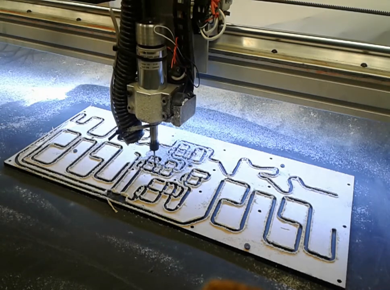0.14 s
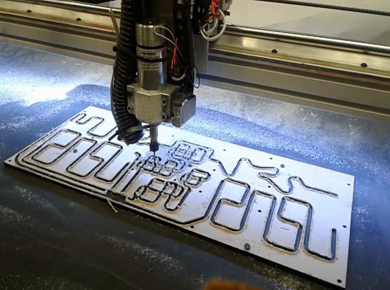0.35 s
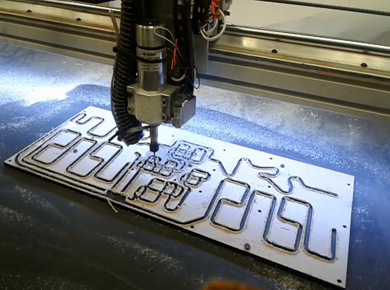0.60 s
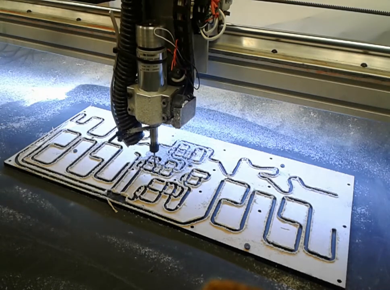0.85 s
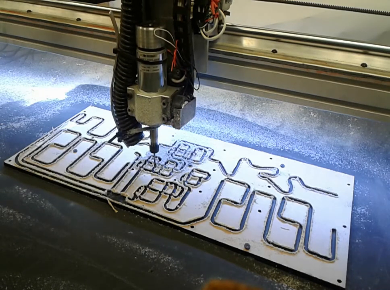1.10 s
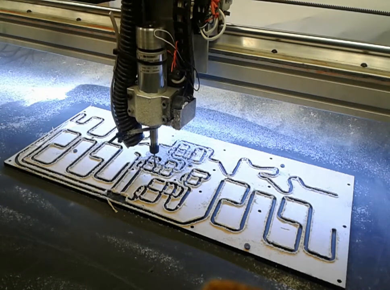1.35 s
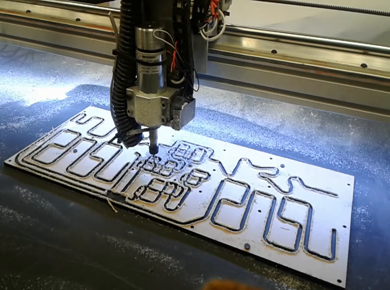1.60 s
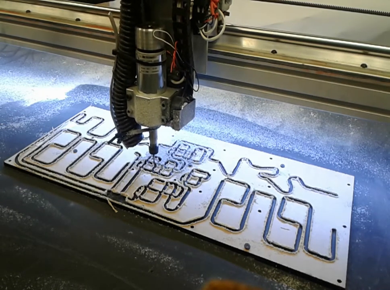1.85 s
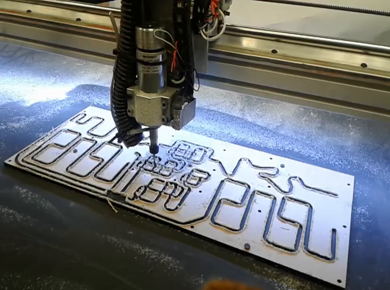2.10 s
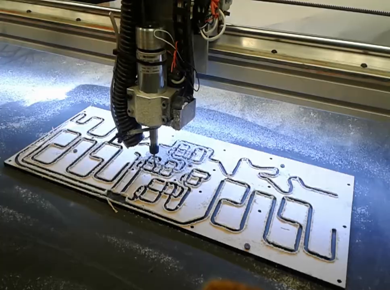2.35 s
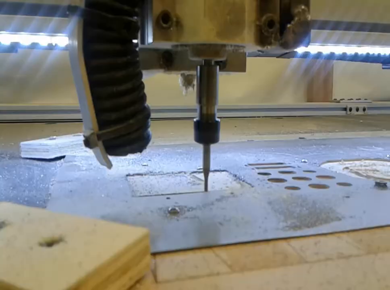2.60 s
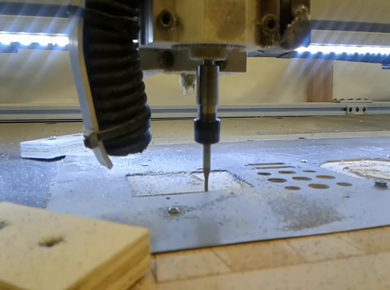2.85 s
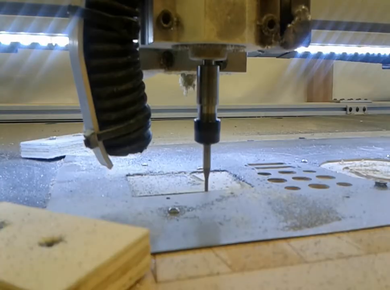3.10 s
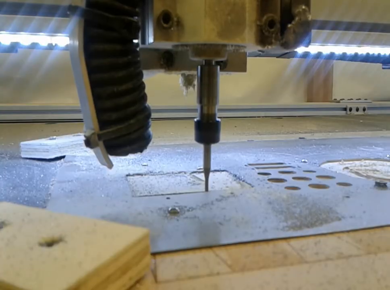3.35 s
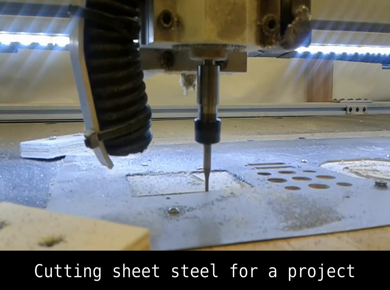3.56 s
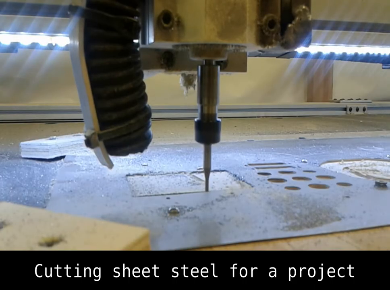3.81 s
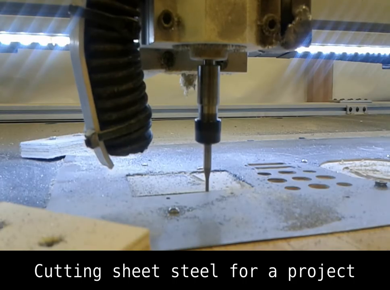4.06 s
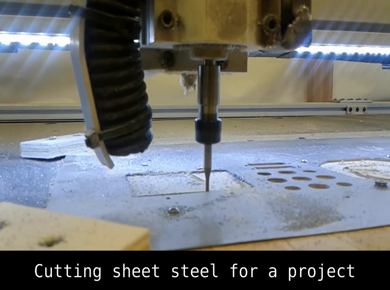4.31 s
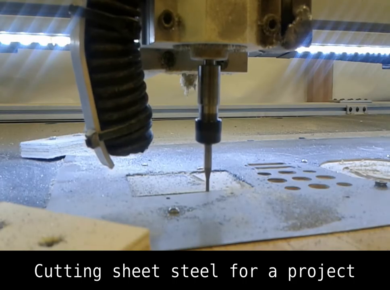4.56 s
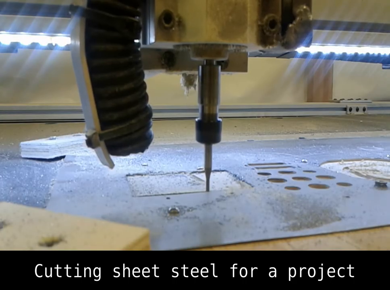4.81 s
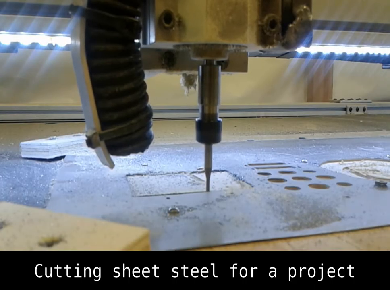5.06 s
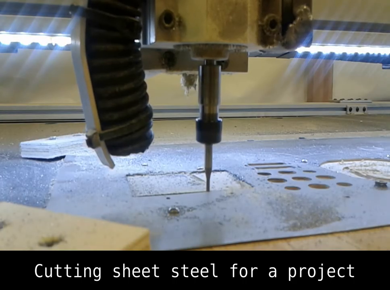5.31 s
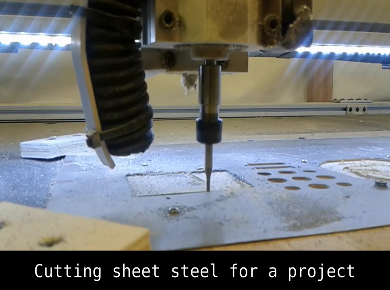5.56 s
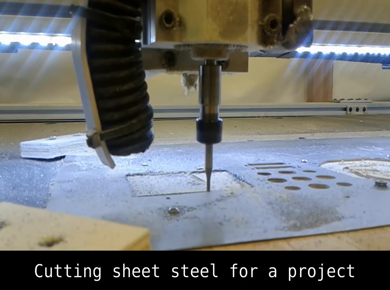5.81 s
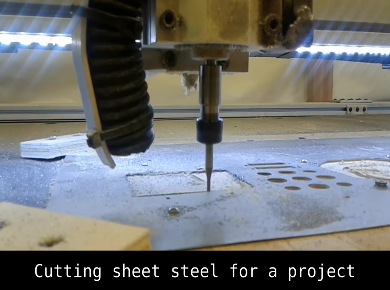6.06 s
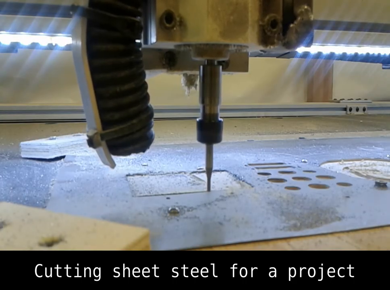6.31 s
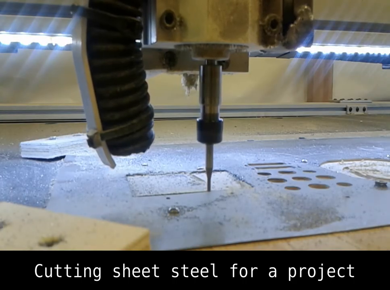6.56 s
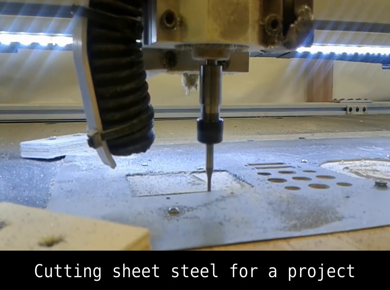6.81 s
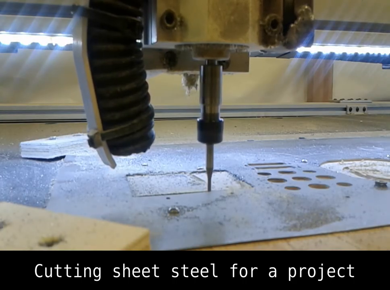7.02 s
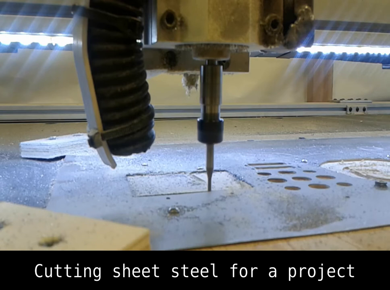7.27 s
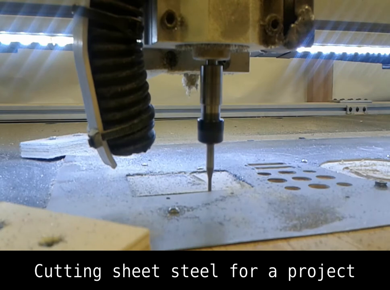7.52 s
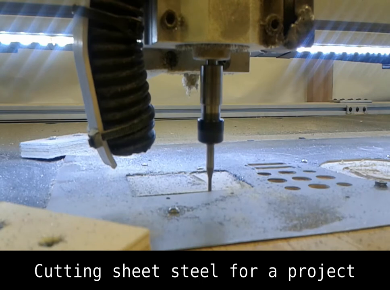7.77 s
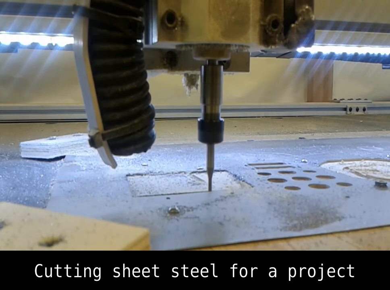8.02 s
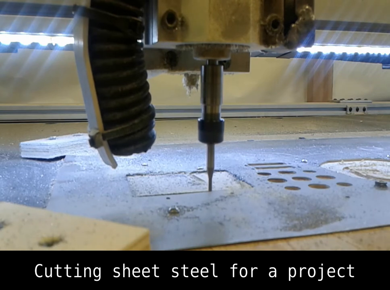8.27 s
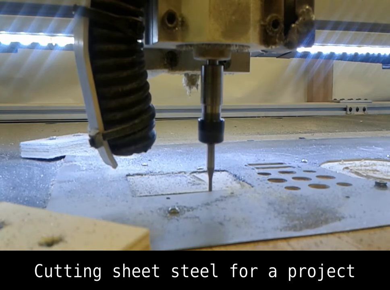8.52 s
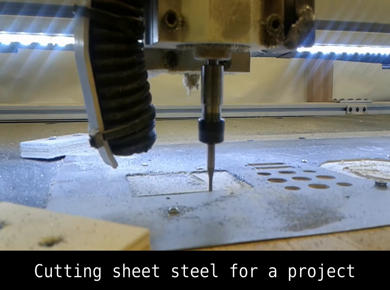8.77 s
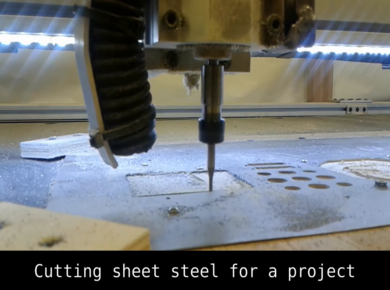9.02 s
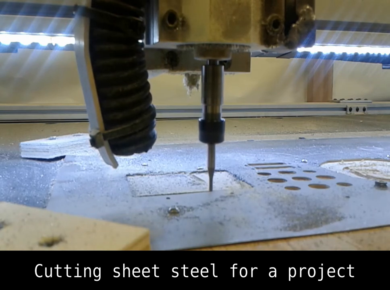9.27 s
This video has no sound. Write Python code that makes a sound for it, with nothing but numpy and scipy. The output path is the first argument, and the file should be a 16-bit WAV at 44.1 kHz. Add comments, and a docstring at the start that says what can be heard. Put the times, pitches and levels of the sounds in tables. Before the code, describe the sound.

In a workshop, a milling spindle hums a step from the microphone beneath rushing air and extractor fan tones, its bit biting metal in short hissing passes while a thin whistle chirps. Sound stops abruptly at 2.4 seconds, then fades in close and louder: a steady buzzing whine of even harmonics, slightly uneven under load, with bright chip snaps and one brief low groan.

```python
"""Workshop, mono: a milling spindle cuts sheet metal beside a running dust extractor.
First, a step away, the bit bites in passes under air noise and fan tones while a thin whistle chirps.
The sound cuts to silence, then fades in close to the bit, where the cutting tones stand far above the air.
There uneven load bends pitch and level, chips snap brightly and one short low groan falls in pitch.
Each shaft turn strikes the sheet and spits chips: harmonics of the shaft speed plus pulsed hiss."""
import sys
import numpy as np
from scipy import signal
from scipy.io import wavfile
from scipy.ndimage import uniform_filter1d

SR = 44100
rng = np.random.default_rng(int(sys.argv[2]) if len(sys.argv) > 2 else 0)


def nominal_scale(level):
    """Amplitude ratio for a level in decibels (scalar or array-like)."""
    x = np.asarray(level, float) / 20
    return 10 ** x


def persist_wave(psi):
    """Save psi, clipped to +-1, as 16-bit WAV."""
    counts = np.round(np.clip(psi, -1, 1) * 32767).astype(np.int16)
    wavfile.write(sys.argv[1], SR, np.atleast_2d(counts).T)


N = 413658
TIME = np.arange(N) / SR

# low harmonics of the shaft, before each view's overall level: order (times shaft speed), level_db
FAR_LOW_ORDERS = [(1, 6), (2, -11), (3, 3.5), (4, -10.5), (5, -8.5), (6, -9.5), (7, -13.5), (8, -17.5),
                  (9, -14), (10, -11.5), (11, -15), (12, -8.5), (13, -4.5), (14, -10.5), (15, -6.5),
                  (16, -23), (17, -27), (18, -15), (19, -23), (20, -10.5), (21, -8), (22, -10), (23, -20),
                  (24, -25.5), (25, -12.5), (26, -17.5), (27, -17.5), (28, -18.5), (29, -14.5), (30, -11)]
NEAR_LOW_ORDERS = [(1, -9), (2, -15.5), (3, -2.5), (4, 0.5), (5, -9.5), (6, -1), (7, -9.5), (8, -3.5),
                   (9, -10.5), (10, -15.5), (11, -18.5), (12, -15), (13, -13.5), (14, -14), (15, -13),
                   (16, -26.5), (17, -27), (18, -26), (19, -23.5), (20, -25.5), (21, -32), (22, -23),
                   (23, -21.5), (24, -25.5), (25, -23.5), (26, -22), (27, -29), (28, -34), (29, -27),
                   (30, -24.5)]
# colour of the high orders, where bit and sheet ring: pitch_hz, relative level_db
FAR_RING_COLOUR = [(3410, -37), (5800, -10.5), (6770, -12), (7710, -0.5), (8070, -3), (8560, -8.5),
                   (8890, 6), (9150, -5.5), (9950, 3.5), (10800, -8), (11800, -22.5), (13500, -12),
                   (14300, -16.5), (14700, -11), (15800, -6.5)]
NEAR_RING_COLOUR = [(5900, -8.5), (6330, -7), (7100, -12), (7670, -7), (8050, -8), (8800, 0.5),
                    (9780, -0.5), (10170, -8), (10550, -12.5), (10740, -11), (10930, -10.5), (11500, -19.5),
                    (12080, -22), (12470, -14), (13400, -12), (14200, -15.5), (15800, -14.5)]
# colour of the rushing air and motor noise: pitch_hz, relative level_db (per Hz)
FAR_AIR_COLOUR = [(30, -30.5), (54, -5.5), (75, -9.5), (90, -15.5), (140, -2.5), (250, -6), (300, -1.5),
                  (480, -4.5), (660, -0.5), (820, -6.5), (1300, -10), (1700, -5.5), (2600, -8), (3300, -13),
                  (6000, -17), (7000, -21), (11300, -29), (15800, -30)]
NEAR_AIR_COLOUR = [(30, -37), (54, -13), (90, -20), (140, -3.5), (250, -8.5), (300, -6), (500, -5),
                   (700, -4.5), (850, -2), (1400, -3), (1700, 3), (2100, -4.5), (2450, -6), (3200, -8.5),
                   (4900, -8.5), (5300, -16.5), (9000, -42)]
# colour of the hiss of chips leaving the flute: pitch_hz, relative level_db (per Hz)
FAR_CHIP_COLOUR = [(3000, -21.5), (4200, -5.5), (6500, -15.5), (8200, -9), (8800, -4.5), (9400, -2),
                   (9800, -1), (10300, -2.5), (10800, -15), (11500, -25.5), (15800, -23)]
NEAR_CHIP_COLOUR = [(3000, -26.5), (5200, -12.5), (6500, -11.5), (7100, -8.5), (7400, -6.5), (8200, -3),
                    (8800, 2), (9800, -2), (10100, -4), (10600, -13.5), (11300, -16.5), (12150, -22),
                    (12350, -12.5), (13000, -14.5), (15800, -22.5)]
# a step away, the bit bites in short passes: start_s, length_s, bite level_db before flutter
BITE_PASSES = [(-.2, .27, -48), (.5, 0.34, -48), (1.27, 0.36, -49.5), (2.22, .05, -45.5),
               (2.3, 0.16, -46.5)]
# chirps of the thin whistle, above its floor: peak_s, level_db
WHISTLE_CHIRPS = [(.045, -56), (.215, -52), (.66, -57), (.77, -57), (.84, -58.5), (.93, -58.5), (1.13, -60),
                  (1.34, -54.5), (1.5, -58), (1.57, -57), (1.72, -58), (1.8, -60), (2.4, -57)]
# fuzzy tones of extractor fan and hose, as heard a step away: pitch_hz, width_hz, level_db
EXTRACTOR_TONES = [(60, 3, -64), (72, 6, -67), (284, 10, -55), (335, 30, -56), (437, 6, -57), (643, 5, -52),
                   (653, 5, -48.5), (869, 4, -60), (873.5, 4, -55), (1306, 8, -59), (1748, 6, -54.5),
                   (1959, 5, -57), (2137, 8, -63), (2189, 8, -63)]
# close up, the feed loads the bit unevenly: time_s, load_db before chatter
FEED_LOAD = [(3.05, 0.65), (3.14, -1.36), (3.22, 3.5), (3.74, -1.88), (3.82, 2), (4.81, -3), (4.85, -0.68),
             (5.04, -0.15), (5.14, -5.6), (5.35, 1.1), (5.67, -4.2), (5.79, 0.24), (6.1, -1.6),
             (6.17, -4.5), (6.28, 1.5), (6.36, -4), (6.41, 0.58), (6.91, 0.74), (6.97, 3.5), (7.26, -3.2),
             (8.49, 3.7), (8.55, -0.6), (8.69, 3.5), (9.36, -1)]
# the bit sinks deeper into the sheet: time_s, depth_db
BIT_DEPTH = [(3.05, -0.5), (3.76, -2), (3.79, -1.2), (6.81, -0.2), (7.15, -2), (7.34, 1.3), (7.78, 2.5),
             (9.36, 1.7)]
# how the low orders answer close up: order, db per db of load, db per db of depth
ORDER_ANSWERS = [(1, 0.23, 0.6), (2, 0.36, 0.5), (3, 0.07, 0.84), (4, 1.05, -0.03), (5, 0.2, -1.3),
                 (6, .05, 1.34), (7, -.3, -0.9), (8, 0.42, -.5), (9, -1, 0.45), (12, -1.5, 1.1),
                 (13, -0.3, 0)]
# sheet resonances stirred by the cut, before the bite's swing: pitch_hz, width_hz, level_db
SHEET_MODES = [(2280, 69, -50.5), (3585, 133, -48.5), (4360, 160, -56.5), (7270, 150, -55), (7800, 79, -50)]
# chips that snap against the bit: start_s, level_db, upper modes' relative level_db
CHIP_SNAPS = [(5.442, -30, -4), (5.9384, -24, -12), (6.1898, -31, -4), (7.003, -28, -8), (8.3883, -27, -4),
              (8.4168, -32, -6), (8.4811, -22, 2), (8.6991, -26, -1), (8.757, -26, -13.5)]
# ringing of the struck bit, before each snap's detuning: pitch_hz, relative level_db, 60 dB decay_s
BIT_MODES = [(7870, 0, .04), (9880, -2, .03), (11250, -12, .03), (14700, -12, .025)]

CUT_S, FADE_START_S, FADE_END_S = 2.4225, 2.756, 3.02
FLUTTER_HZ, FLUTTER_DB = 14, 1.5  # unsteadiness of the bite in both views: width, rms
NEAR_BITE_DB = -40
# the sheet answers a blow with a lead; past each bending resonance it swings the other way
LEAD_RAD, BENDING_HZ = 1, (1050, 1430, 1820)


def evened(x):
    """Scales to rms 1."""
    return x / np.sqrt(np.mean(abs(x) ** 2) + 1e-20)


def read(points, hz):
    """Reads a spectrum in dB on a log-frequency axis."""
    point_hz, level_db = np.transpose(points)
    return np.interp(np.log(hz + 1), np.log(point_hz + 1), level_db)


def add(mix, start_s, sound):
    """Mixes a sound in at its start time."""
    part = mix[round(start_s * SR):][:len(sound)]
    part += sound[:len(part)]


def wander(t, width_hz):
    """Slow complex chance of total rms 1: white noise through two equal poles, 400 draws a second."""
    step_s = np.arange(t[0], t[-1] + 1, 1 / 400)
    pole = np.exp(-np.pi * width_hz / 400)
    white = rng.standard_normal((len(step_s), 2)) @ [1, 1j]
    slow = evened(signal.lfilter([1], [1, -2 * pole, pole * pole], white))
    return np.interp(t, step_s, slow.real) + 1j * np.interp(t, step_s, slow.imag)


def flutter(t):
    """Quick unsteadiness of the bite, as a random swing in dB."""
    return FLUTTER_DB * np.sqrt(2) * wander(t, FLUTTER_HZ).real


def noise(t, colour, patchy_db):
    """Coloured noise of rms 1 from random short-time spectra with drifting patches (rms patchy_db)."""
    real, imaginary, patches = rng.standard_normal((len(t) // 256 + 5, 513, 3)).T
    patches = uniform_filter1d(patches, size=10, axis=0)  # across frequency
    patches = evened(uniform_filter1d(patches, size=12, axis=1))  # across time
    colour_db = read(colour, np.fft.rfftfreq(1024, 1 / SR))[:, None] + patchy_db * patches
    spectra = (real + 1j * imaginary) * nominal_scale(colour_db)
    return evened(signal.istft(spectra, nperseg=1024, noverlap=768)[1][:len(t)])


def fuzzy_tones(t, modes, steady):
    """One tone for each line or resonance, part steady and part narrow noise."""
    out = np.zeros(len(t))
    for hz, width_hz, db in modes:
        fixed_part = steady * np.exp(2j * np.pi * rng.random())
        shape = fixed_part + np.sqrt(1 - steady ** 2) * wander(t, width_hz)
        out += np.sqrt(2) * nominal_scale(db) * (shape * np.exp(2j * np.pi * hz * t)).real
    return out


def passes(t):
    """Bite in dB: each pass digs in gradually, holds and lets go quickly, with flutter throughout."""
    bite = nominal_scale(-60)  # between passes
    for start_s, length_s, db in BITE_PASSES:
        rise = (t - start_s) / (.6 * length_s)
        release = 1 - (t - start_s - length_s) / .03
        bite = bite + nominal_scale(db) * np.clip(np.minimum(rise, release), 0, 1)
    return 20 * np.log10(bite) + flutter(t)


def spindle(t, speed_hz, bite_db, low_db, ring, chips, idle_db, ring_db, chips_db, follow,
            rough, waver_hz, scatter, gate):
    """Repeated blows make shaft harmonics, more wavering higher up; chips hiss in two puffs a turn."""
    angle = 2 * np.pi * np.cumsum(speed_hz) / SR
    mean_hz = speed_hz.mean()
    bite_db = 20 * np.log10(np.hypot(nominal_scale(bite_db), nominal_scale(idle_db)))  # never quite silent
    swing_db = bite_db - bite_db.mean()
    low, high = np.zeros(len(t)), np.zeros(len(t))
    turn, carrier = np.exp(1j * angle), np.ones(len(t))
    for order in range(1, int(ring[-1][0] / mean_hz) + 1):
        carrier = carrier * turn
        blur = np.clip(rough * order, 0, .85)  # uneven blows blur the high orders most
        shape = np.sqrt(1 - blur ** 2) + blur * wander(t, waver_hz * order)
        phase = LEAD_RAD - np.pi * np.searchsorted(BENDING_HZ, order * mean_hz)
        phase = phase + scatter * order * rng.standard_normal()
        tone = np.sqrt(2) * (shape * np.exp(1j * phase) * carrier).real
        if order <= len(low_db):
            low += nominal_scale(low_db[order - 1]) * tone
        else:
            high += nominal_scale(read(ring, order * mean_hz)) * tone
    puffs = np.exp(gate[0] * np.cos(angle) + gate[1] * np.cos(2 * angle))
    hiss = evened(puffs * noise(t, chips, patchy_db=1.5))
    # high orders and hiss each follow the bite by their own share
    ringing = nominal_scale(ring_db + follow[0] * swing_db) * evened(high)
    spitting = nominal_scale(chips_db + follow[1] * swing_db) * hiss
    return low + ringing + spitting


def whistle(t):
    """A narrow fuzzy tone on a faint floor, raised by short bell-shaped chirps."""
    level = nominal_scale(-68)  # floor
    for peak_s, db in WHISTLE_CHIRPS:
        level = level + nominal_scale(db) * np.exp(-.5 * ((t - peak_s) / .013) ** 2)
    return level * fuzzy_tones(t, [(5052, 20, 0)], steady=.85)


def extractor(t, steady):
    """Fan and hose hum as a set of fuzzy tones."""
    return fuzzy_tones(t, EXTRACTOR_TONES, steady)


def far_view():
    """From a step away the extractor and its air cover much of the spindle."""
    t = TIME[TIME < CUT_S]
    low_db = [db - 56 for order, db in FAR_LOW_ORDERS]
    speed_hz = 194.3 + 0.118 * wander(t, 3).real
    cut = spindle(t, speed_hz, passes(t), low_db, FAR_RING_COLOUR, FAR_CHIP_COLOUR,
                  idle_db=-51.5, ring_db=-54.5, chips_db=-52.0, follow=(.7, 1.1),
                  rough=.012, waver_hz=.25, scatter=0.065, gate=(.4, .25))
    air = nominal_scale(-40.5) * noise(t, FAR_AIR_COLOUR, patchy_db=1.2)
    return cut + air + extractor(t, steady=.97) + whistle(t)


def near_speed(t, load_db):
    """Load slows the shaft a little; its weight smooths every change of speed."""
    speed_hz = 191.8 - .04 * load_db + .1 * wander(t, 2).real
    return uniform_filter1d(speed_hz, size=SR // 8)


def sheet(t, bite_db):
    """Sheet resonances as narrow noise, swelling with the bite."""
    return nominal_scale(0.84 * (bite_db - NEAR_BITE_DB)) * fuzzy_tones(t, SHEET_MODES, steady=0)


def near_view():
    """Close to the bit the shaft orders stand far above air and extractor."""
    t = TIME[TIME >= FADE_START_S]
    load_db = np.interp(t, *np.transpose(FEED_LOAD))
    load_db += .9 * np.sqrt(2) * wander(t, 10).real  # chatter: quick unevenness on top
    depth_db = np.interp(t, *np.transpose(BIT_DEPTH))
    low_db = [db - 32 for order, db in NEAR_LOW_ORDERS]
    for order, per_load, per_depth in ORDER_ANSWERS:
        low_db[order - 1] += per_load * load_db + per_depth * depth_db
    bite_db = NEAR_BITE_DB + 0.14 * load_db + flutter(t)
    cut = spindle(t, near_speed(t, load_db), bite_db, low_db, NEAR_RING_COLOUR, NEAR_CHIP_COLOUR,
                  idle_db=-40.0, ring_db=-39.5, chips_db=-38.5, follow=(1.1, .9),
                  rough=.025, waver_hz=.6, scatter=.06, gate=(.5, .2))
    air = nominal_scale(-38) * noise(t, NEAR_AIR_COLOUR, patchy_db=1)
    return cut + air + nominal_scale(-14.0) * extractor(t, steady=.88) + sheet(t, bite_db)


def snaps():
    """Chips strike the bit, which rings in decaying sine modes, detuned at random."""
    out, t = np.zeros(N), TIME[:SR // 10]
    for start_s, db, upper_db in CHIP_SNAPS:
        modes = []
        for hz, mode_db, decay_s in BIT_MODES:
            pitch_hz = hz * rng.uniform(0.93, 1.01)
            modes.append(nominal_scale(mode_db - 60 * t / decay_s) * np.sin(2 * np.pi * pitch_hz * t))
        onset = np.minimum(t / .003, 1)
        add(out, start_s, nominal_scale(db) * onset * (modes[0] + nominal_scale(upper_db) * sum(modes[1:])))
    return out


def groan():
    """A short low sine gliding down in pitch under a rounded swell."""
    out = np.zeros(N)
    start_s, length_s, peak_db, from_hz, to_hz = 7.17, .11, -36, 195, 110
    progress = TIME[TIME < length_s] / length_s
    cycles = np.cumsum(from_hz + (to_hz - from_hz) * progress) / SR
    swell = np.sin(np.pi * np.sqrt(progress)) ** 2
    add(out, start_s, nominal_scale(peak_db) * swell * np.sin(2 * np.pi * cycles))
    return out


def scene():
    """Far view, silence, then a straight fade into the near view, with snaps and groan."""
    far, near = far_view(), near_view()
    mix = snaps() + groan()
    mix[:len(far)] += far
    fade = np.interp(TIME[-len(near):], (FADE_START_S, FADE_END_S), (0, 1))
    mix[-len(near):] += near * fade
    return mix[None]


def low_pass(x):
    """Removes everything above the highest recorded frequency."""
    return signal.sosfilt(signal.butter(12, 15980, fs=SR, output="sos"), x)


def record(dry):
    """The microphone cuts the lowest bass; a steep filter limits the treble."""
    thin = signal.sosfilt(signal.butter(8, 52, "high", fs=SR, output="sos"), dry)
    treble_limit = signal.firwin(2047, 15750, window=("kaiser", 9), fs=SR)
    limited = signal.oaconvolve(thin, treble_limit[None], "same")
    # the edit leaves true silence between the views
    limited[:, (TIME > CUT_S + .003) & (TIME < FADE_START_S)] = 0
    return low_pass(limited)


dry = scene()
out = record(dry)
persist_wave(out)
```